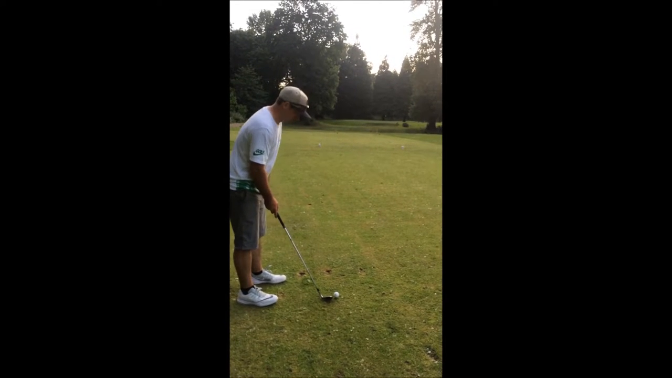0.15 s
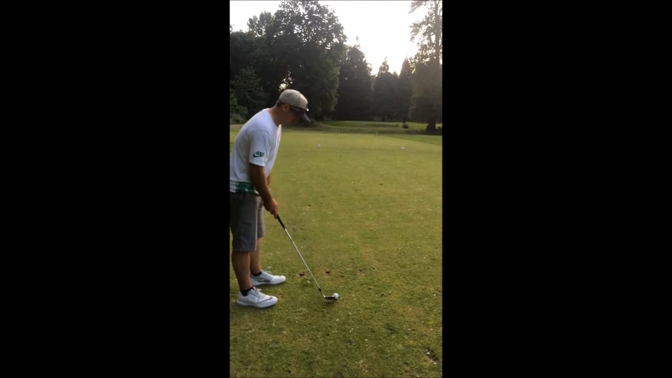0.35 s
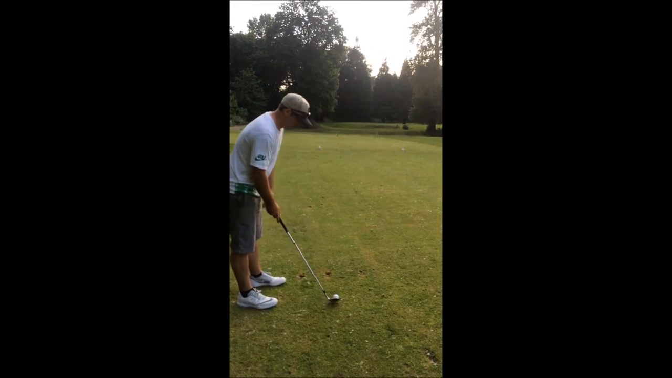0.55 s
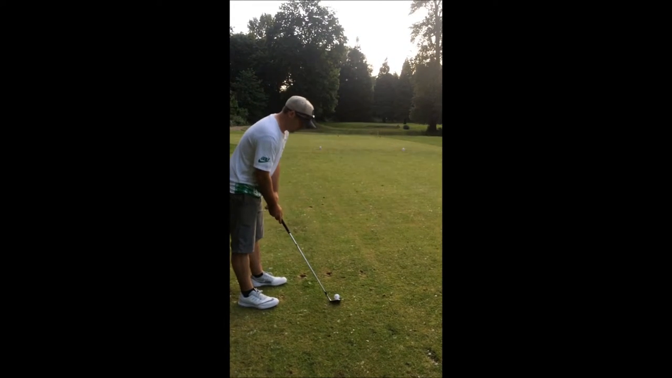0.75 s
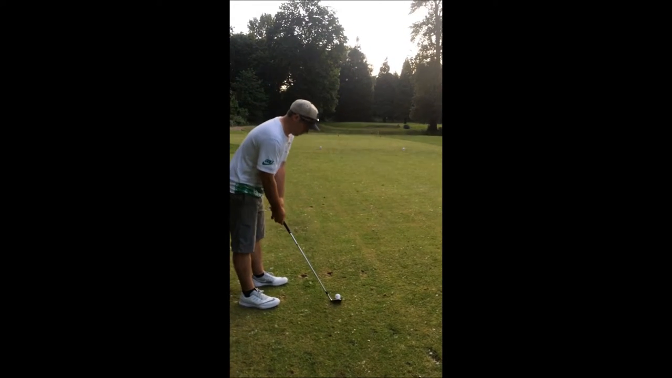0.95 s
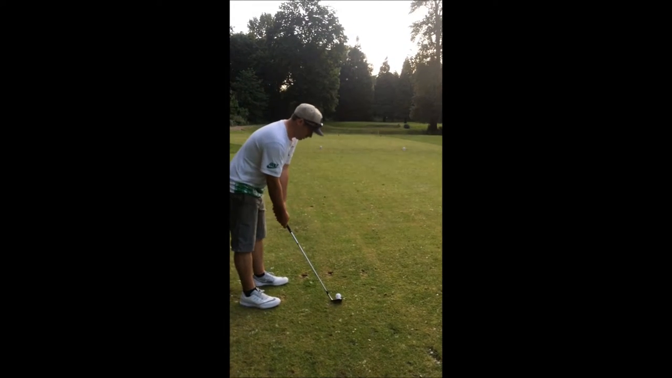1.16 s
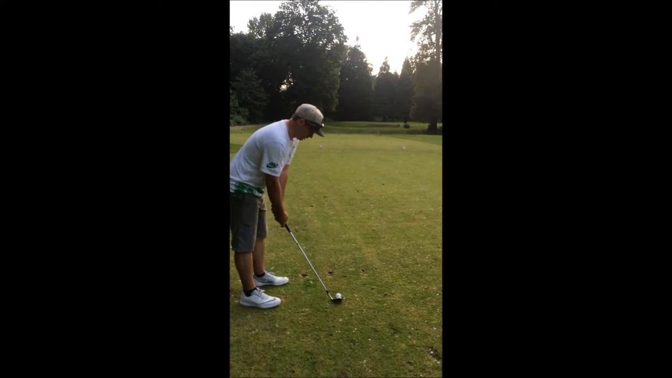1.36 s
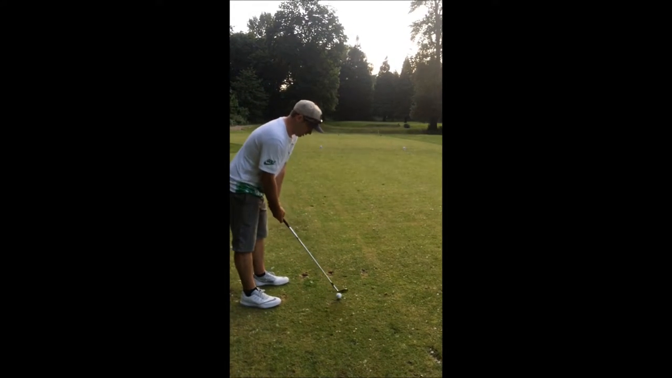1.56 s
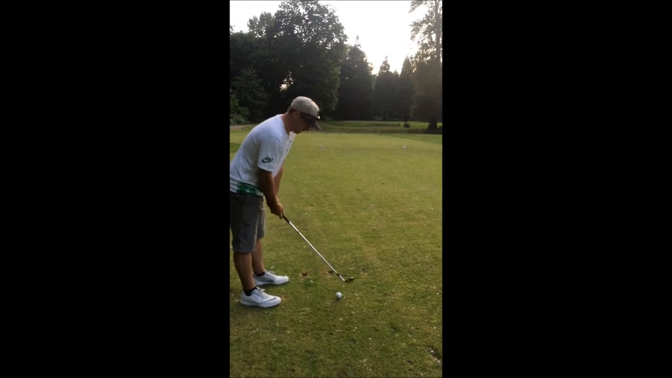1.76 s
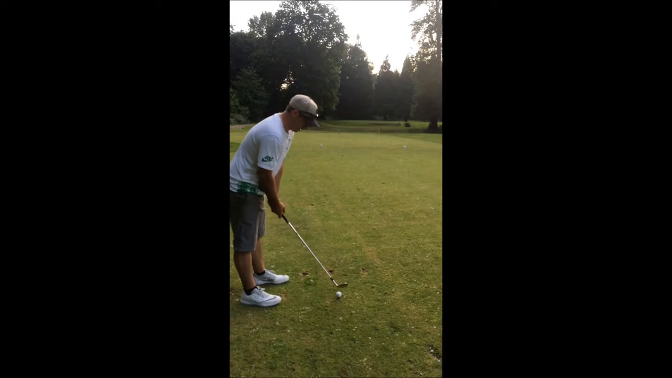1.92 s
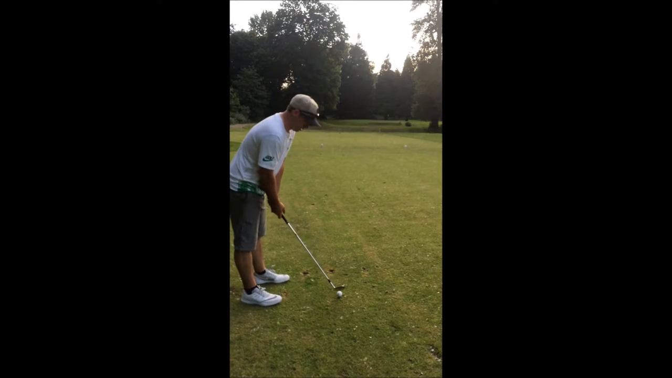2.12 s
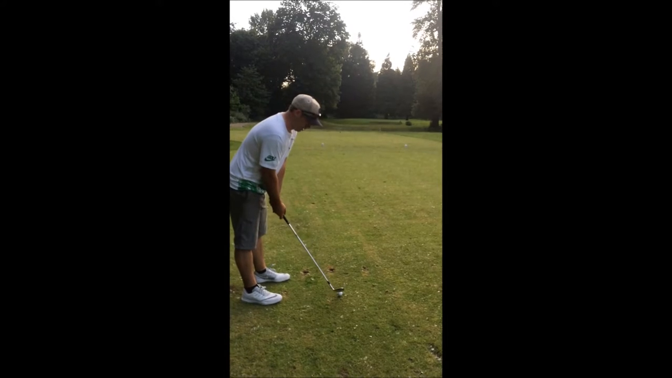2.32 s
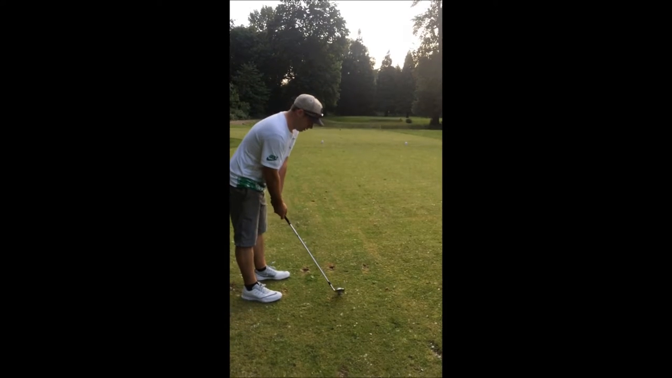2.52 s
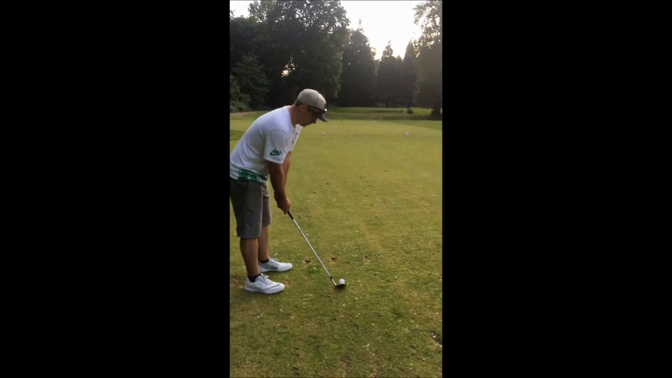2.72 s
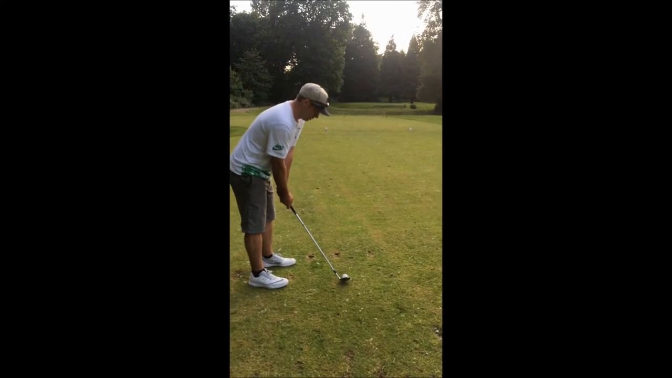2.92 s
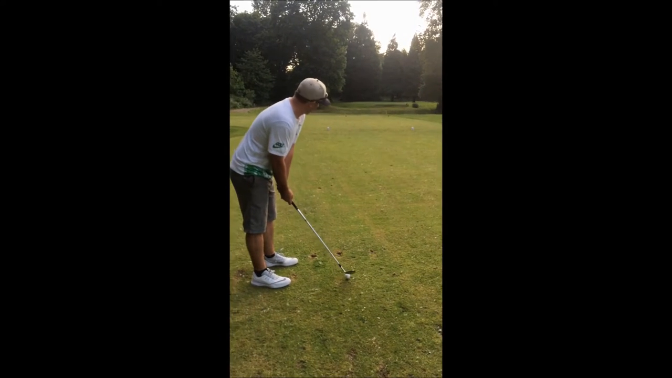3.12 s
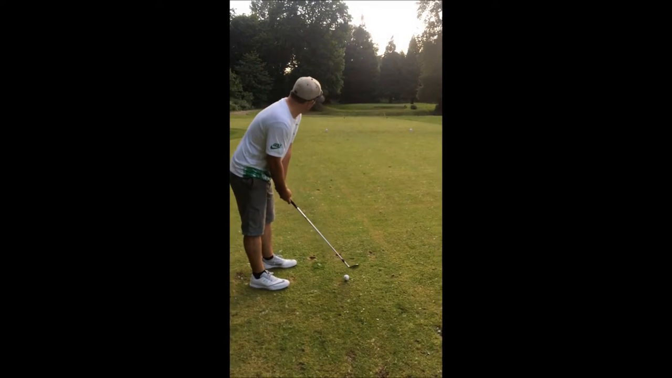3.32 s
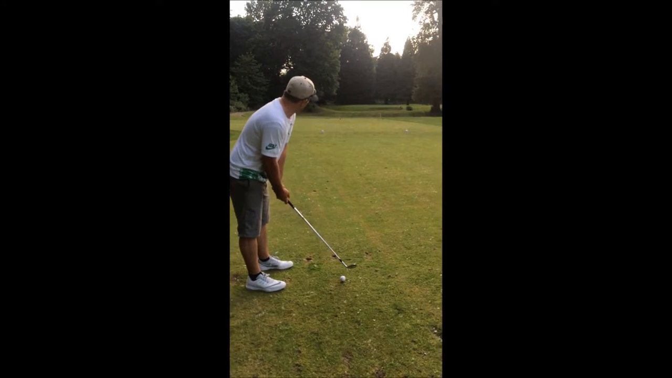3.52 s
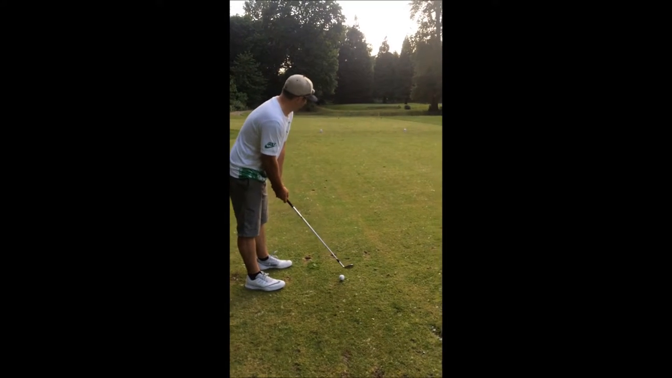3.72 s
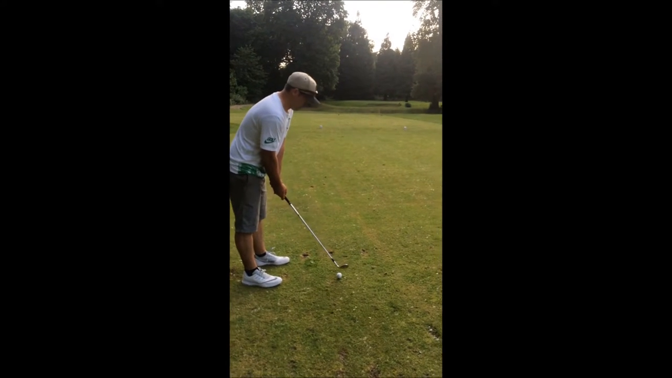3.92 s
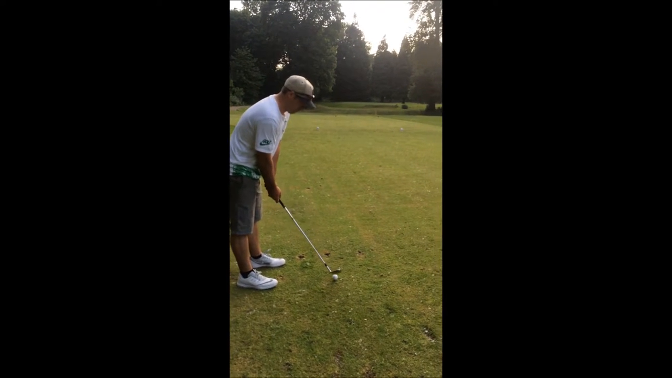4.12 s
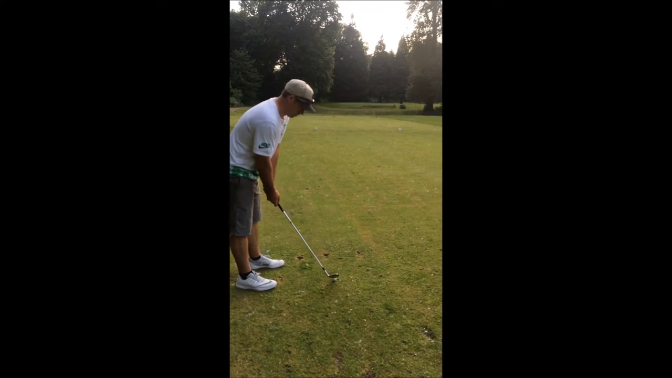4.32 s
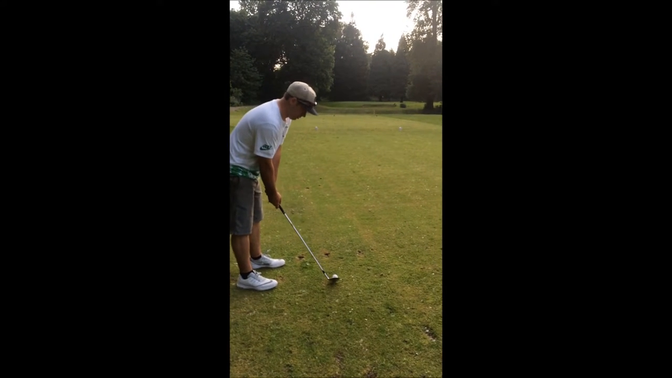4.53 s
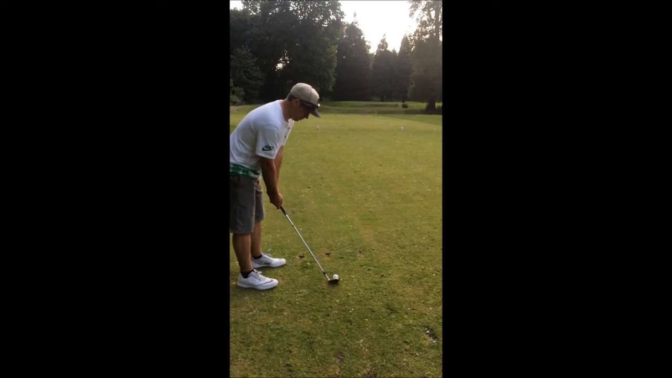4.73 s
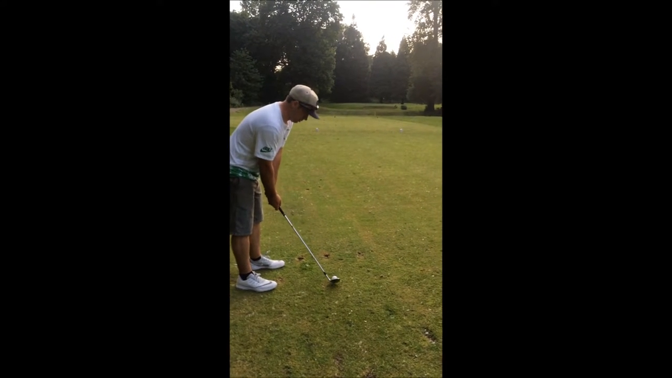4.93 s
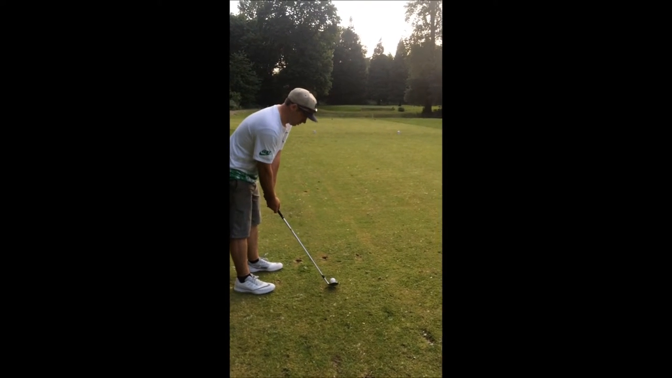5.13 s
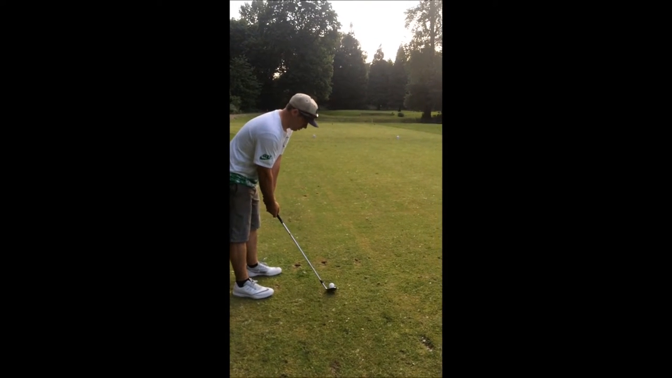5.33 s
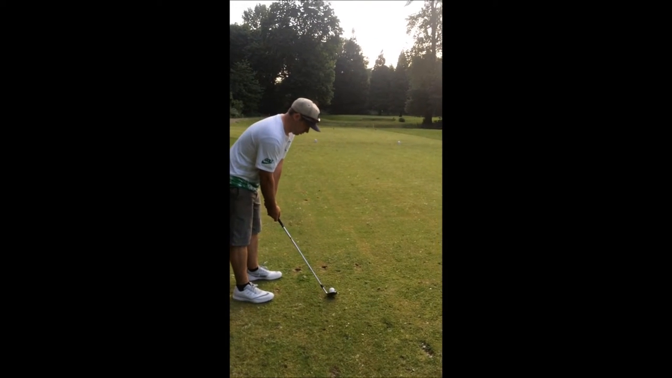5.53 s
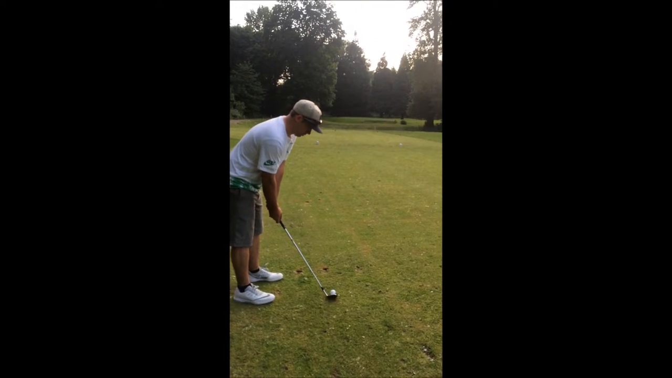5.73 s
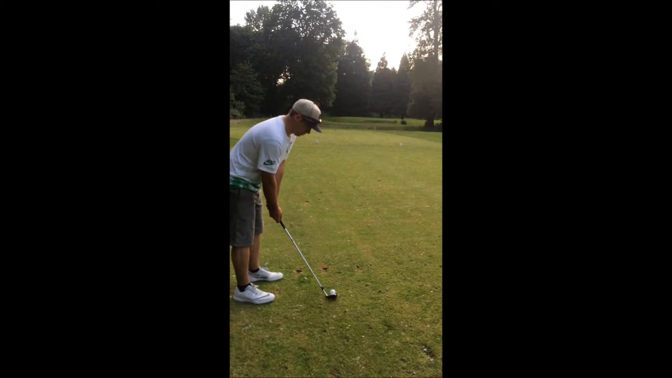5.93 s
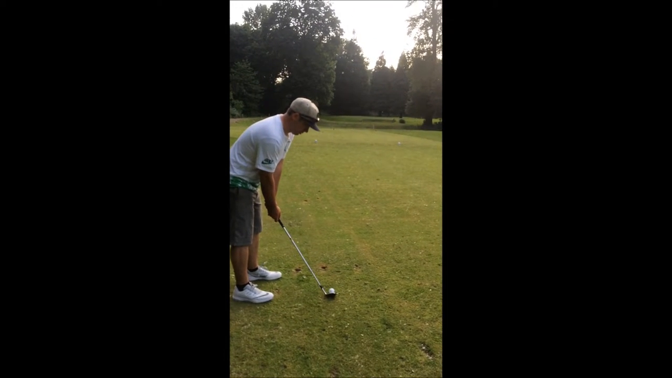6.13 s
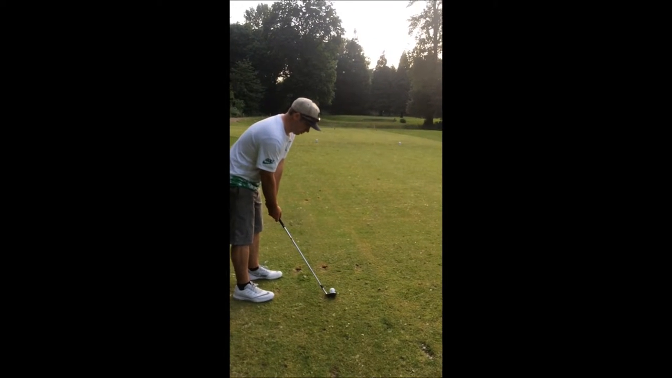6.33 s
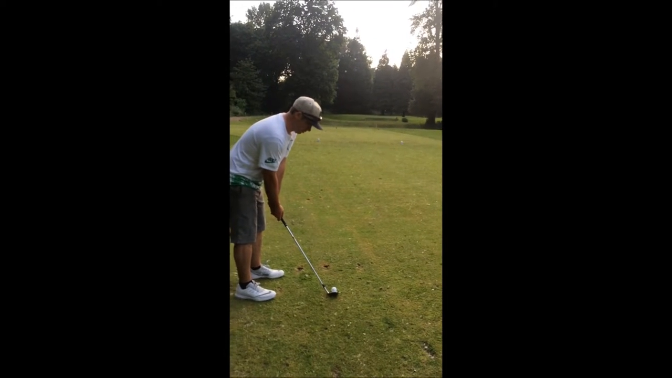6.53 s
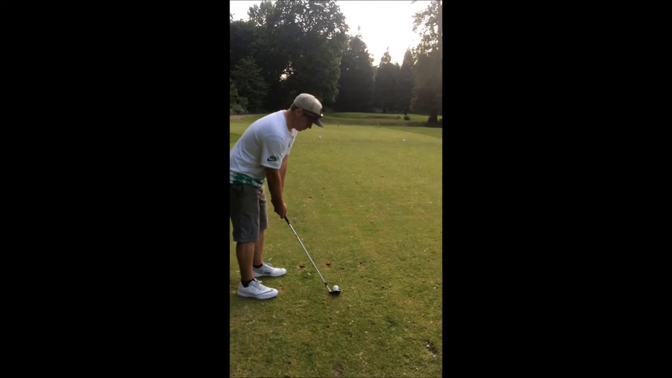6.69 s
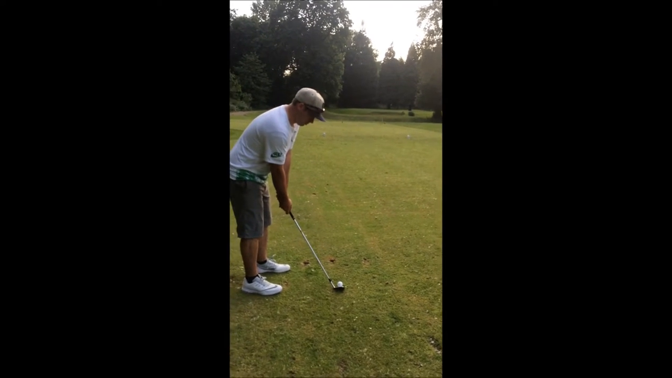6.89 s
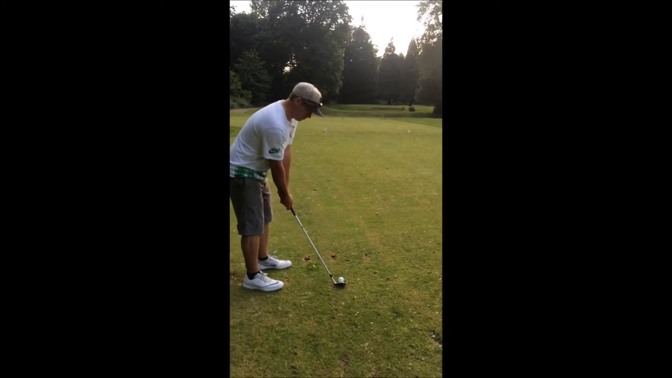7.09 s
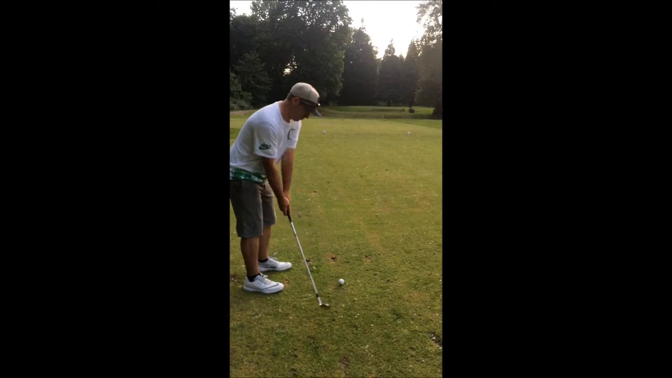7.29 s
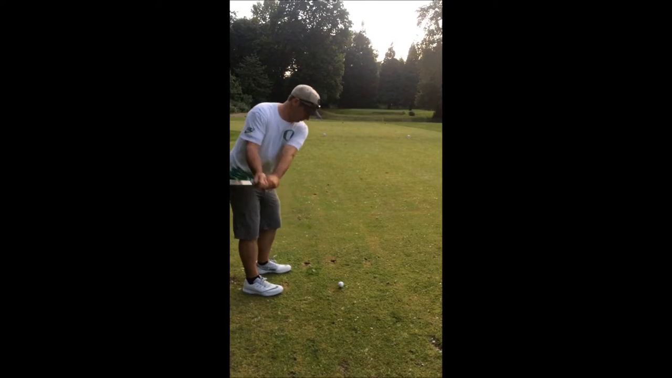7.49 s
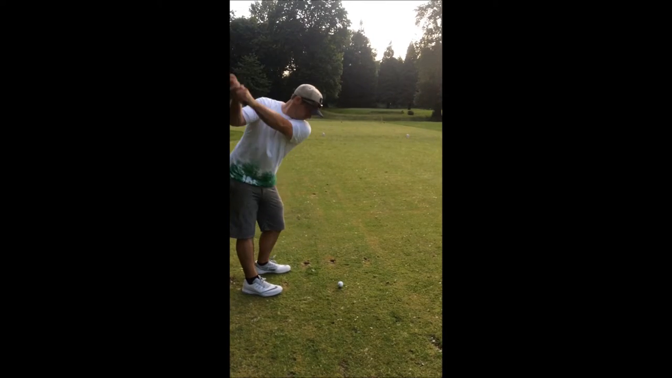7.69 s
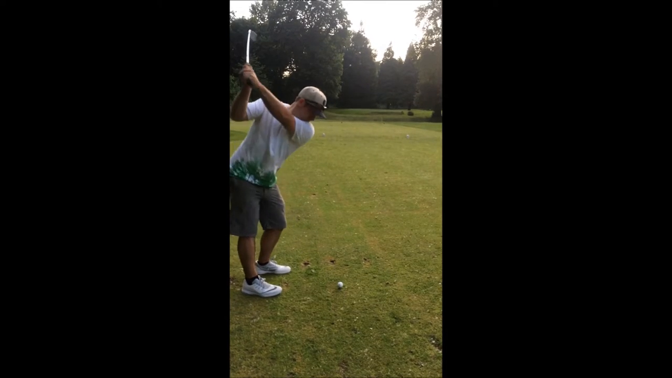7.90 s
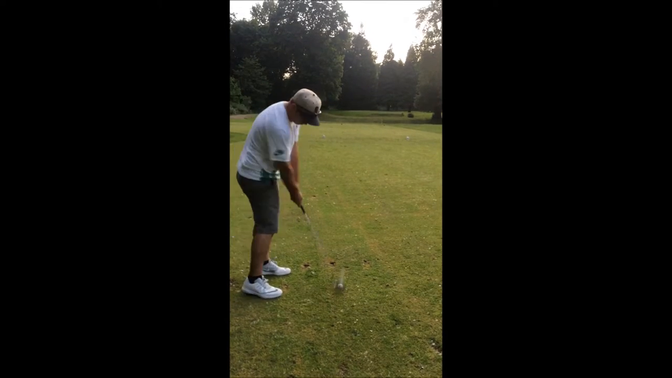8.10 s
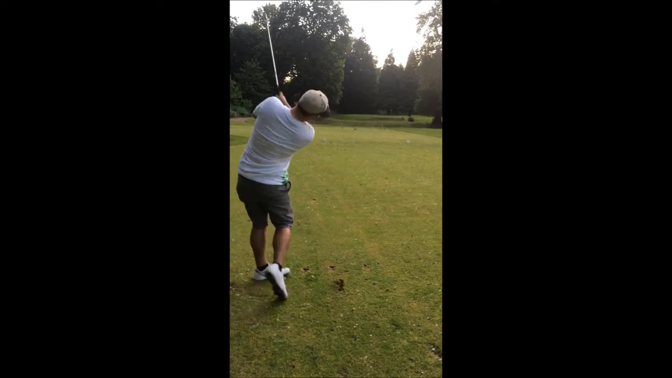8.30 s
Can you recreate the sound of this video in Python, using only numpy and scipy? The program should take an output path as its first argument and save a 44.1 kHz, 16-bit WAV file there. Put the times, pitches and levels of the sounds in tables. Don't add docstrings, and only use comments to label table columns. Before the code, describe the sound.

Birds chirp and trill faintly over a steady low far-off rumble for eight seconds, until a whoosh and a hard, dry metallic ball strike.

```python
import sys
import numpy as np
from scipy import signal
from scipy.fft import rfft, irfft, next_fast_len
from scipy.io import wavfile
from scipy.ndimage import uniform_filter1d

SR = 44100
rng = np.random.default_rng(int(sys.argv[2]) if len(sys.argv) > 2 else 0)


def how_loud(loudness_db):
    steps = np.asarray(loudness_db, float) / 20
    return 10 ** steps


def put_to_file(sound):
    columns = np.atleast_2d(sound).T
    safe = np.clip(columns, -1, 1)
    whole_steps = np.round(safe * 32767)
    wavfile.write(sys.argv[1], SR, whole_steps.astype(np.int16))


N = 368250
TIME = np.arange(N) / SR
FAST = next_fast_len(N)
FREQ = np.fft.rfftfreq(FAST, 1 / SR) + 1e-3
TOP_HZ = 15350


def unit(x):
    return x / np.sqrt(np.mean(x ** 2))


def shaped(gain):
    spectrum = rfft(rng.standard_normal(FAST))
    return unit(irfft(spectrum * gain(FREQ), FAST)[:N])


def colour(spectrum):
    hz, db = np.transpose(spectrum)
    return lambda f: how_loud(np.interp(np.log(f), np.log(hz), db))


def peak(hz, width_hz):
    return lambda f: 1 / (1 + (2 * (f - hz) / width_hz) ** 2)


def walk(rate_hz):
    k = int(SR / rate_hz)
    held = np.repeat(rng.standard_normal(N // k + 1), k)
    return uniform_filter1d(uniform_filter1d(held, k), k)[:N]


def add(out, start_s, x):
    i = int(round(start_s * SR))
    out[i:i + len(x)] += x[:max(len(out) - i, 0)]


def ring(hz, t60_s, length_s=.08):
    t = np.arange(int(length_s * SR)) / SR
    return np.sin(2 * np.pi * hz * t) * np.exp(-np.log(1000) * t / t60_s)


def note(hz, db, edge=0.32):
    window = signal.windows.tukey(len(hz), min(edge, 1.))
    return np.sqrt(2) * how_loud(db) * window * np.sin(2 * np.pi * np.cumsum(hz) / SR)


def traffic():
    # (frequency [Hz], density [dB per Hz])
    road_spectrum = [(18, -39), (30, 1.5), (64, -1), (143, -3.5), (313, -20.5), (366, -23.5), (488, -22),
                     (570, -23), (960, -22), (1310, -27.5), (2940, -47.5), (15200, -64.5)]
    # (frequency [Hz], width [Hz], level [dB])
    engines = [(73.53, 8.6, -44.5), (137.4, 4.1, -49), (163.2, 14, -51)]
    # (time [s], length [s], frequency [Hz], level [dB])
    hums = [
        (.9, 0.93, 486.5, -64.5),
        (3.4, 1.57, 486.5, -65),
        (6.8, 1.55, 486.5, -60),
        (6.95, .52, 650, -59),
    ]
    road_db, motor_db, motor_hz = -40.9, -75, 486.5
    tyres_db, tyres_s = 1.46, 2.5

    road = rfft(rng.standard_normal(FAST)) * colour(road_spectrum)(FREQ)
    road = road * (FREQ < TOP_HZ) / (1 + (42 / FREQ) ** 4)
    out = 0
    for octave in range(0, 11, 2):
        offset = (np.log2(FREQ / 24) - octave) / 2
        share = np.cos(np.pi / 2 * np.clip(offset, -1, 1)) ** 2
        hiss_db = tyres_db * np.exp(-(TIME / tyres_s) ** 2) * (octave == 6)
        swell_db = hiss_db + 0.45 * walk(1.45) + 0.36 * walk(8)
        out = out + how_loud(swell_db) * irfft(road * share, FAST)[:N]

    drones = sum(how_loud(db + 2.0 * walk(1.194)) * shaped(peak(hz, width_hz)) for hz, width_hz, db in engines)
    motor = how_loud(motor_db) * shaped(peak(motor_hz, 4.9))
    for start_s, length_s, hz, db in hums:
        add(motor, start_s, note(np.full(int(length_s * SR), hz), db, .35))
    return how_loud(road_db) * unit(out) + drones + how_loud(1.5 * walk(9)) * motor


def calls(waver):
    # (time [s], length [s], frequency [Hz], level [dB])
    held = [(0.0, .37, 4230, -65), (0.373, 0.26, 3650, -58), (0.687, .37, 3630, -57.5),
            (.428, .15, 7300, -80), (.27, .06, 5430, -82), (.6, .08, 3060, -74), (1.75, .06, 7500, -82),
            (2.255, .11, 7950, -82), (3.29, .21, 2490, -67), (3.86, .29, 3980, -73), (4.08, .1, 3850, -70),
            (5.1, .16, 3300, -72), (5.267, .36, 3580, -69), (5.82, .27, 4190, -72), (6.44, .06, 3850, -78),
            (8.03, .05, 3820, -74)]
    # (time [s], level [dB])
    peeps = [(7.07, -67), (7.47, -64), (7.76, -65), (7.99, -66)]
    # (time [s], first frequency [Hz], last frequency [Hz], level [dB])
    slides = [(2.02, 3600, 2600, -75), (2.81, 3300, 3600, -69), (2.9, 5470, 6600, -73),
              (3.108, 4250, 3300, -65), (3.224, 4300, 3500, -66), (3.79, 3450, 3700, -71),
              (3.65, 3300, 4400, -73), (4.27, 3900, 3000, -73), (4.37, 3300, 3500, -70),
              (5.137, 4300, 3600, -71), (5.196, 3900, 4700, -60), (5.26, 4500, 2670, -69),
              (5.39, 4100, 2800, -69), (5.921, 3400, 2900, -75), (6.025, 4200, 2800, -64.5),
              (6.925, 3600, 2200, -66), (7.038, 4400, 2900, -66.5), (7.183, 4400, 2400, -65),
              (7.976, 3400, 2900, -68), (8.09, 4200, 3300, -67)]
    # (time [s], first frequency [Hz], last frequency [Hz], level [dB])
    ticks = [(3.123, 7600, 5600, -77), (4.52, 6900, 6200, -76), (4.654, 6900, 6200, -72.5),
             (4.78, 6800, 6100, -70), (4.972, 7100, 5100, -66), (6.292, 6900, 4900, -68),
             (7.07, 5500, 4800, -75), (7.21, 5500, 4900, -77)]
    # (length [s], top frequency [Hz], second overtone [Hz], second level [dB])
    low_chirp = (0.05, 3868, 4580, -3.5)
    high_chirp = (.105, 6780, 5759, -9)
    # (time [s], level [dB])
    low_calls = [(.355, -68.5), (1.073, -67), (2.53, -67), (5.473, -67), (6.765, -68)]
    high_calls = [(1.055, -80), (2.86, -72.5), (4.408, -74), (5.56, -73), (7.258, -72.5)]
    held_rise = .015
    peep_s, peep_hz, tick_s = 0.058, 3500, .02
    slide_oct_per_s, slide_min_s = 17, .028
    breath_db_per_s, swell_share = 40, .16

    glides = [(s, length_s, hz, hz * (1 + held_rise), db) for s, length_s, hz, db in held]
    glides += [(s, peep_s, peep_hz, peep_hz, db) for s, db in peeps]
    for s, first_hz, last_hz, db in slides:
        slide_s = abs(np.log2(last_hz / first_hz)) / slide_oct_per_s
        glides.append((s, max(slide_s, slide_min_s), first_hz, last_hz, db))
    glides += [(s, tick_s, first_hz, last_hz, db) for s, first_hz, last_hz, db in ticks]

    out = np.zeros(N)
    for start_s, length_s, first_hz, last_hz, db in glides:
        n = int(length_s * SR)
        hz = np.linspace(first_hz, last_hz, n) * waver[int(start_s * SR):][:n]
        add(out, start_s, note(hz, db - breath_db_per_s * TIME[:n], max(.015 / length_s, swell_share)))

    for chirp, times in ((low_chirp, low_calls), (high_chirp, high_calls)):
        length_s, top_hz, second_hz, second_db = chirp
        u = np.linspace(-1, .8, int(length_s * SR))
        bend = min(5e-5 / length_s ** 3, .13)
        for start_s, db in times:
            arch = (1 - bend * abs(u) ** 3) * waver[int(start_s * SR):][:len(u)]
            add(out, start_s, note(top_hz * arch, db, 0.22) + note(second_hz * arch, db + second_db, 0.34))
    return out


def birds():
    # (time [s], length [s], top frequency [Hz], rate [notes/s], level [dB])
    trills = [
        (1.413, 0.76, 4800, 7, -68.5),
        (2.097, .2, 5500, 22, -68),
        (2.27, 0.41, 5860, 17, -71.5),
        (2.798, .177, 6900, 17, -70),
        (2.805, 0.34, 4670, 19, -74),
        (3.56, .3, 4750, 19, -69),
        (3.881, 0.52, 6500, 13, -74),
        (3.952, 0.89, 5130, 19.5, -70.5),
        (5.05, .21, 3720, 45, -62.5),
        (5.68, .3, 4920, 23, -75),
    ]
    fall_share, rest_hz = .36, 2400
    trees_t60_s, trees_db, birds_db = .8, -3, -6
    chorus_db = -78

    waver = 1 + 0.0087 * walk(120)
    near = calls(waver)
    far, busy = np.zeros(N), np.zeros(N)
    pace = 1 + 0.23 * walk(4.2)
    for start_s, length_s, top_hz, rate, db in trills:
        n, i = int(length_s * SR), int(start_s * SR)
        phase = np.cumsum(pace[i:i + n]) / SR * rate % 1
        fall_hz = fall_share * (top_hz - rest_hz) * phase ** (19 / rate)
        tone = note((top_hz - fall_hz) * waver[i:i + n], db, 0.084)
        add(far, start_s, tone * np.sin(np.pi * phase) ** 0.15)
        add(busy, start_s, np.hanning(n + SR // 5) ** 2)

    t = TIME[:SR // 2]
    echoes = rng.standard_normal(len(t)) * np.exp(-np.log(1000) * t / trees_t60_s)
    echoes = echoes / np.sqrt(np.sum(echoes ** 2))
    wet = signal.fftconvolve(how_loud(trees_db) * near + far, echoes)[:N]
    direct = how_loud(2.5 * walk(70)) * (near + how_loud(-10.5) * far)
    chorus = np.sqrt(busy) * how_loud(chorus_db + 2.5 * walk(40)) * shaped(peak(4250, 3400))
    return how_loud(birds_db) * (direct + wet) + chorus


def rustles():
    # (time [s], length [s], level [dB], low edge [Hz])
    brushes = [
        (.66, .14, -78, 6800),
        (1.985, .022, -61.5, 7000),
        (1.93, 0.15, -75, 6600),
        (7.2, 0.135, -71, 6500),
        (7.905, 0.003, -58, 3000),
        (7.45, 0.51, -77, 6500),
        (8.0, .1, -69, 3700),
    ]
    out, grit = np.zeros(N), walk(150)
    for start_s, length_s, db, low_hz in brushes:
        n, i = int(length_s * SR), int(start_s * SR)
        band = signal.butter(2, [low_hz, TOP_HZ], "band", fs=SR, output="sos")
        bright = signal.sosfilt(band, rng.standard_normal(SR))[:n]
        add(out, start_s, how_loud(db + 3.8 * grit[i:i + n]) * np.hanning(n) * bright)
    return out


def swing():
    # (time [s], shaft speed [m/s])
    path = [
        (8.09, 14),
        (8.15, 26),
        (8.168, 33),
        (8.19, 36.2),
        (8.24, 30),
    ]
    # (frequency [Hz], density [dB per Hz])
    rush_spectrum = [(250, -8.5), (600, -1), (1500, -4.5), (3000, -11), (6000, -16.5), (11000, -25),
                     (15500, -27.5)]
    shaft_m, full_m_per_s = .012, 36.2
    whistle_db, whistle_db_per_oct = -33, 30
    rush_db, rush_db_per_oct = -32, 48
    low_s, hush_db_per_s = 8.192, 1600

    path_s, path_m_per_s = np.transpose(path)
    speed = np.interp(TIME, path_s, path_m_per_s)
    shed_hz = speed / (5 * shaft_m) * (1 + 0.0377 * walk(120))
    whistle = how_loud(1.5 * walk(90)) * np.sin(2 * np.pi * np.cumsum(shed_hz) / SR)
    rush = how_loud(1.6 * walk(400)) * shaped(colour(rush_spectrum))
    octaves = np.log2(speed / full_m_per_s)
    hush = how_loud(-hush_db_per_s * np.maximum(TIME - low_s, 0)) * (TIME > path_s[0])
    whistle = how_loud(whistle_db + whistle_db_per_oct * octaves) * whistle
    return hush * (whistle + how_loud(rush_db + rush_db_per_oct * octaves) * rush)


def strike():
    # (time [s], peak [dB], contact [ms], face ring [dB], sole ring [dB])
    blows = [
        (8.20132, 1.2, .105, -16, -24),
        (8.20255, -24, .14, -18, -7.5),
        (8.20428, -30, .12, -15, -24),
        (8.2081, -40, .15, -22, -19),
        (8.2089, -16, .25, -26, -24),
    ]
    # (frequency [Hz], level [dB], t60 [s])
    face_modes = [(2800, -2, 0.016), (3400, -1.5, 0.0093), (4800, -9, 0.0068), (5940, -5.5, 0.0076),
                  (7400, -14, 0.0087), (8400, -13, 0.0072), (11150, 0, 0.0048), (13500, -8, .005)]
    # (frequency [Hz], level [dB], t60 [s])
    sole_modes = [(1180, -7, .018), (1740, 0, .011), (1960, -2, .013)]
    # (delay [s], length [s], level [dB], centre [Hz], width [Hz])
    tree_return = (.055, .13, -54, 3300, 2200)
    thud_s, thud_hz, thud_db, thud_t60_s = 8.2075, 170, -20.5, 0.063

    out = np.zeros(N)
    face = sum((-1) ** k * how_loud(db) * ring(hz, t60_s) for k, (hz, db, t60_s) in enumerate(face_modes))
    sole = sum(how_loud(db) * ring(hz, t60_s) for hz, db, t60_s in sole_modes)
    for start_s, db, contact_ms, face_db, sole_db in blows:
        subsample = start_s * SR - round(start_s * SR)
        contacts = (np.arange(-4, 60) - subsample) / SR * 1000 / contact_ms
        push = np.sin(np.pi * np.clip(contacts, 0, 1)) ** 2
        rebound = np.sin(np.pi * np.clip((contacts - .9) / 5, 0, 1)) ** 2
        add(out, start_s - 4 / SR, how_loud(db) * (.45 * rebound - push))
        modes = how_loud(face_db) * face + how_loud(sole_db) * sole
        add(out, start_s - 4 / SR, np.convolve(push / push.sum(), modes))
    add(out, thud_s, how_loud(thud_db) * ring(thud_hz, thud_t60_s, .15))

    delay_s, length_s, db, hz, width_hz = tree_return
    n = int(length_s * SR)
    crack = how_loud(db + 2.5 * walk(166)[:n]) * np.hanning(n) * shaped(peak(hz, width_hz))[:n]
    add(out, blows[0][0] + delay_s, crack)
    return out


def turf():
    # (frequency [Hz], density [dB per Hz])
    soil_spectrum = [(200, -20), (700, -8), (1500, -6), (3000, -12), (6000, -17), (12000, -21.5),
                     (15500, -23)]
    tear_s, attack_s, hold_s = 8.2010, .0008, .005
    tear_db, tear_db_per_s = -21, 1900
    spray_db, spray_db_per_s = -49, 75

    grains = how_loud(2.9 * walk(900) + .5 * walk(150))
    t = np.maximum(TIME - tear_s, 0)
    tear = how_loud(tear_db - tear_db_per_s * np.maximum(t - hold_s, 0))
    spray = how_loud(spray_db - spray_db_per_s * t + 1.5 * walk(200))
    attack = np.minimum(t / attack_s, 1) ** 2
    return attack * (tear + spray) * unit(grains * shaped(colour(soil_spectrum)))


def scene():
    return (traffic() + birds() + rustles() + swing() + strike() + turf())[None]


def low_pass(x):
    return signal.sosfilt(signal.butter(12, 16460, fs=SR, output="sos"), x)


def record(dry):
    hiss_db, hiss_hz, hiss_width_hz = -84.5, 13000, 6000
    hiss = how_loud(hiss_db) * shaped(peak(hiss_hz, hiss_width_hz))
    lowpass = signal.ellip(6, .3, 26, TOP_HZ, fs=SR, output="sos")
    mix = np.clip(signal.sosfilt(lowpass, dry + hiss), -1, 1)
    return low_pass(mix)


dry = scene()
out = record(dry)
put_to_file(out)
```